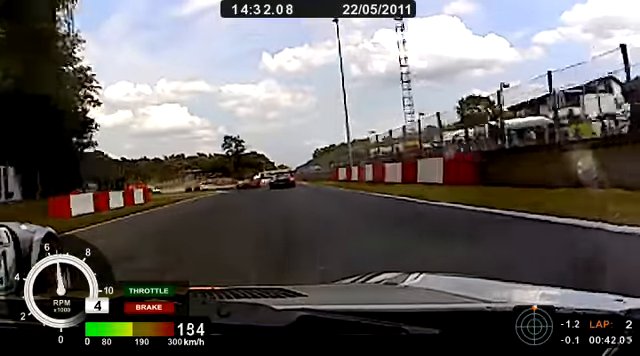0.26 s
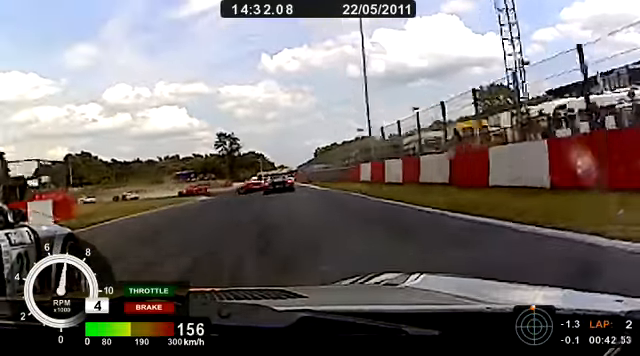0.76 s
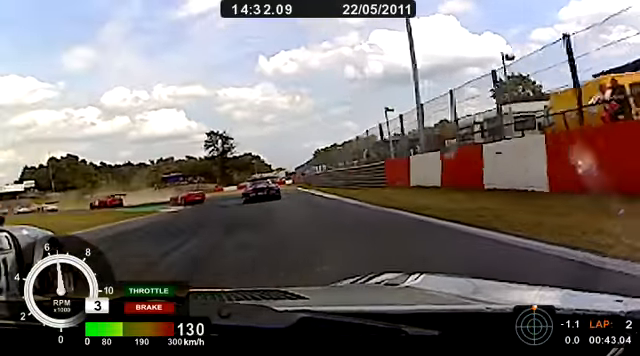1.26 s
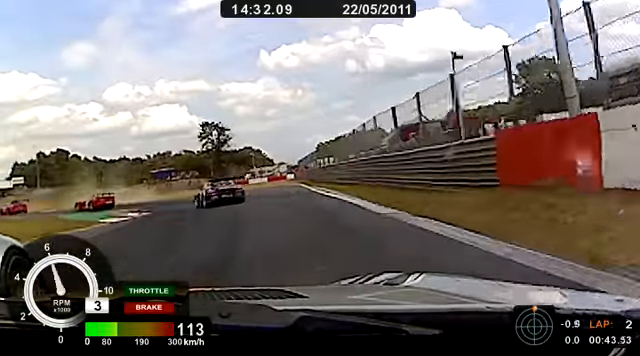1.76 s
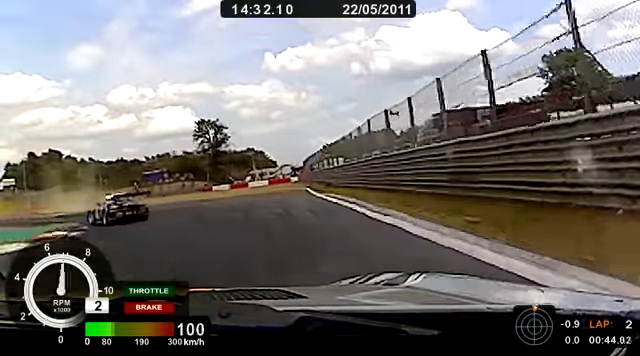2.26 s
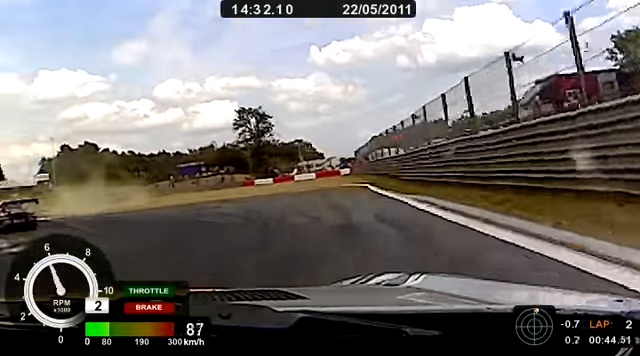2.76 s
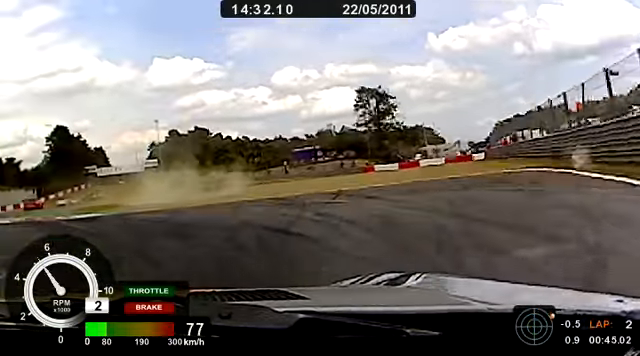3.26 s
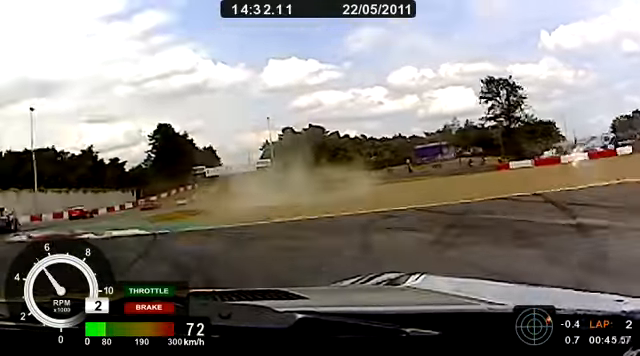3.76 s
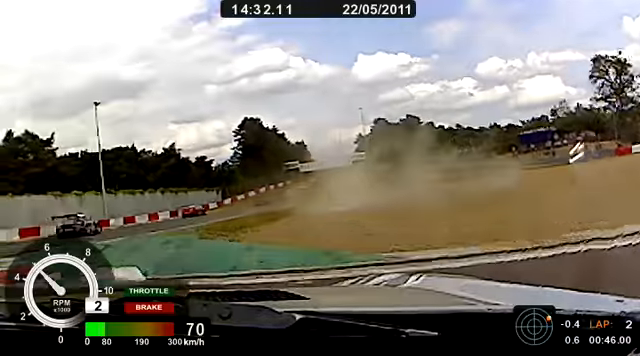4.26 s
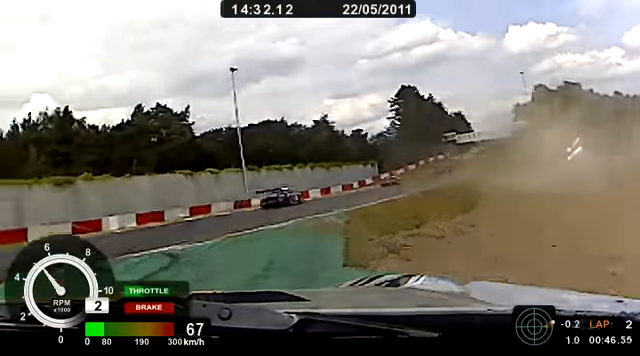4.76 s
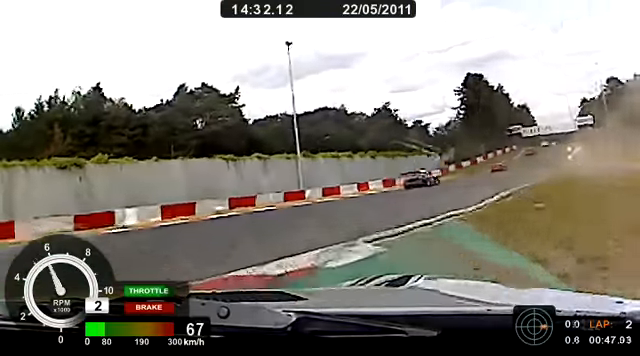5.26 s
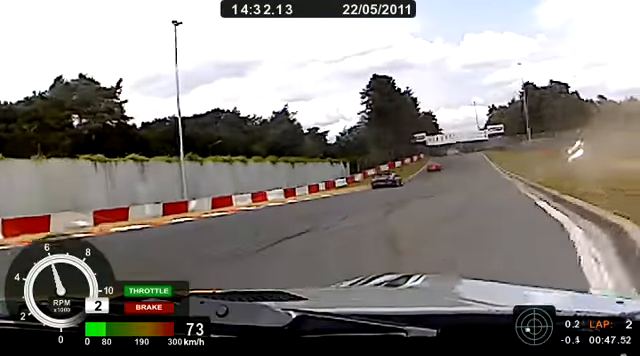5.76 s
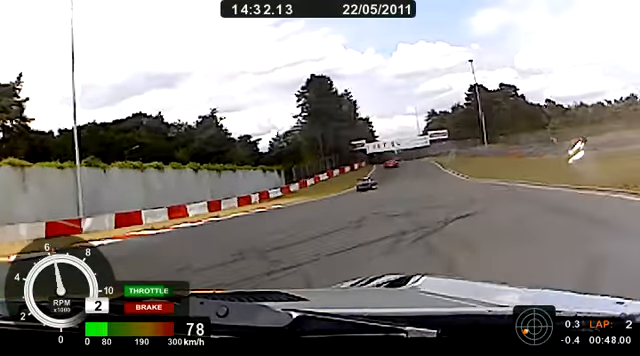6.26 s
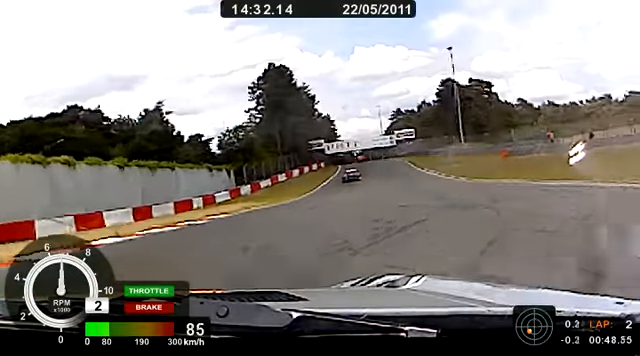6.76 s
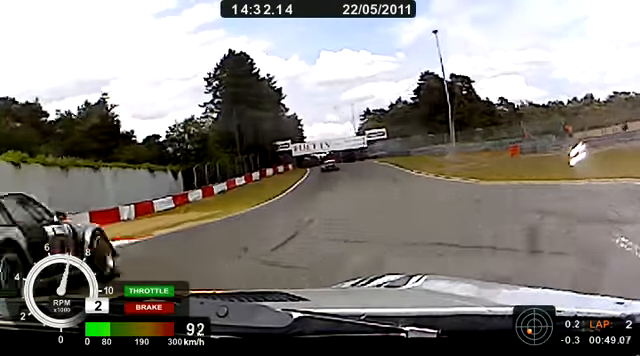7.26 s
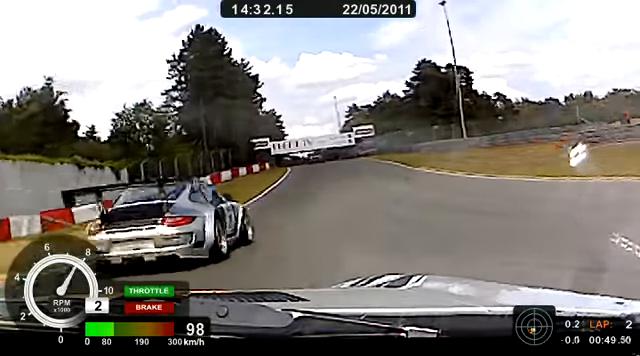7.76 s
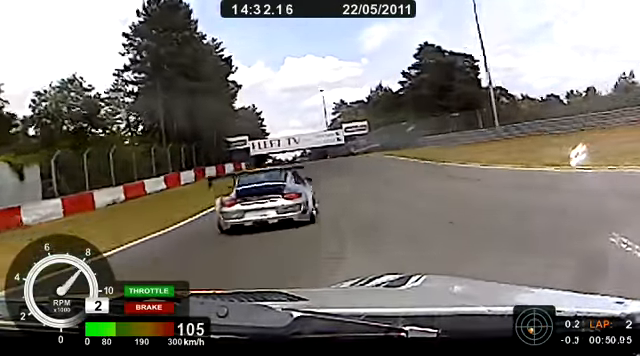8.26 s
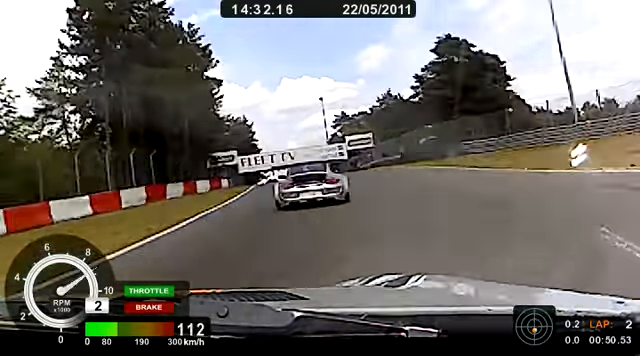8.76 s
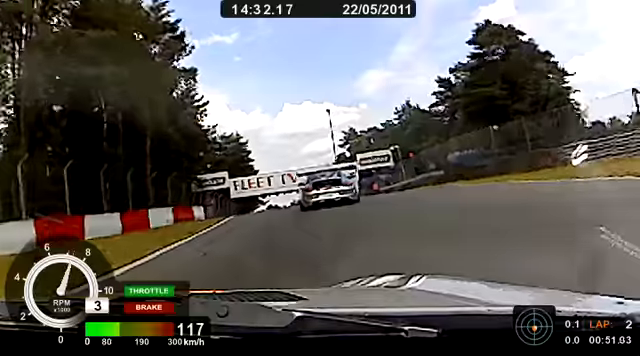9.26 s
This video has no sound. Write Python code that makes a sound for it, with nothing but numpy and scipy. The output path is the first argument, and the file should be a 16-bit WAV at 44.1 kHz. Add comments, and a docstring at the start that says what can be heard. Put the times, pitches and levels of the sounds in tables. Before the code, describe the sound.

Close inside a race car cabin, a deep V8 drone falls under braking while three downshifts make it jump up, with thumps, faint brake squeals and fading gear whine. It burbles slowly through a corner, then scrubs over a dusty kerb with knocks and stones pinging the floor. The throttle opens, another car's steady rising note passes, and the engine howls up to a thudding upshift. The small on-board microphone sounds dull on top and squashes the peaks.

```python
"""First a booming firing note inside a V8 race car as it brakes through three downshifts, gears whining.
It then runs over a kerb with scrub, knocks and grit, pulls hard and shifts up while another car passes.
A sine carries the firing note, sums of sines the crank orders; gears and the rival are gliding tones.
Filtered noise makes burble, rasp, tyres, knocks and stones; a small on-board recorder rounds off the peaks."""
import sys
import numpy as np
from scipy import signal
from scipy.fft import rfft, irfft
from scipy.io import wavfile
from scipy.ndimage import uniform_filter1d

SR = 44100
rng = np.random.default_rng(int(sys.argv[2]) if len(sys.argv) > 2 else 0)


def file_out(sig):
    """Save sig as 16-bit WAV at sys.argv[1]."""
    # one column per channel
    cols = np.atleast_2d(sig).T
    # limit, then scale
    lim = np.clip(cols, -1, 1)
    pcm = np.round(lim * 32767).astype(np.int16)
    wavfile.write(sys.argv[1], SR, pcm)


N = 419832
T = np.arange(N) / SR  # time [s]
HZ = np.maximum(np.arange(N // 2 + 1) * SR / N, 1)  # spectrum frequencies [Hz]

# throttle pedal: (time [s], opening [0-1])
THROTTLE = [(0, 0.1), (.6, 0), (4.55, 0.04), (4.7, .45), (5.85, .6), (6.1, 0.9), (8.88, 1), (8.94, 0.3),
            (9.02, 0.1), (9.1, 1), (9.52, .96)]
# driven wheels, which spin up a little over the kerb: (time [s], speed [km/h])
WHEEL_SPEED = [(0.0, 167.494), (0.19, 154.559), (0.492, 150.999), (1.037, 119.461), (1.452, 112.498),
               (1.872, 93.168), (2.181, 91.295), (2.983, 74.838), (4.439, 68.255), (5.385, 76.716),
               (5.939, 89.266), (5.993, 83.48), (7.543, 104.095), (8.025, 111.31), (8.879, 121.919),
               (9.52, 127.472)]
FIRST_RATIO = 1.3  # gear at the start [firing Hz per km/h]
# three downshifts and one upshift: (start [s], length [s], new ratio [firing Hz per km/h])
SHIFTS = [(0.154, 0.287, 1.58), (0.984, 0.315, 1.962), (1.92, 0.225, 2.435), (8.86, 0.2, 1.966)]
# jolts that set the driveline winding and unwinding:
# (time [s], swing of the firing rate [Hz], swing rate [Hz], decay [s])
DRIVELINE_JOLTS = [(0.838, 20.853, 3.403, 0.111), (3.283, 14.301, 3.613, 0.31),
                   (4.337, 12.283, 3.529, 0.581), (4.873, 6.491, 4.882, 0.702),
                   (5.071, 13.882, 3.344, 0.39), (5.744, 25.07, 6.562, 0.118),
                   (8.999, -19.723, 5.644, 0.219)]

# cabin response to the firing note, before a common trim: (firing rate [Hz], level [dB])
CABIN_BOOM = [(160, -16.5), (168, -16), (180, -13.5), (192, -14.5), (208, -14.5), (228, -16.5), (240, -15),
              (255, -15), (264, -22.5), (272, -25.5), (280, -24), (298, -23.5)]
# brief dips of the firing note: (centre [s], half length [s], depth [dB])
NOTE_DIPS = [(0.1, 0.1, 6), (0.363, 0.031, 8.53), (0.949, 0.16, 9), (1.221, 0.031, 21), (1.947, 0.065, 11),
             (2.128, 0.014, 8.5), (2.681, 0.11, 6.5), (3.203, 0.074, 6.443), (3.945, 0.035, 6.513),
             (4.268, 0.043, 4), (4.547, 0.045, 15.949), (5.82, 0.02, 9.5), (6.3, 0.081, 5.5),
             (6.89, 0.16, 5.724), (8.986, 0.057, 7), (9.194, 0.052, 4.038)]
# throb of the unequal cylinder banks, before air modes and revs: (crank order, level [dB])
BANK_THROB = [(1, -37), (2, -38), (3, -37.5), (5, -43), (6, -45), (7, -50.5)]
# the throb grows with the revs and weakens off the throttle
THROB_FULL_HZ, THROB_DB_PER_DOUBLING, THROB_COAST_DB = 277, 9.5, 1
# air modes of the cabin: (centre [Hz], width [Hz], lift [dB])
AIR_MODES = [(145.9, 27, 8.5), (216, 30, 1.5), (345, 44, -2)]
# pipe lengths bring single orders into tune: (crank order, centre [Hz], width [Hz], lift [dB])
PIPE_TUNINGS = [(8, 360, 85, 12.5), (8, 505, 33, 14), (8, 587, 40, 9.5), (9, 630, 130, 10.5),
                (11, 590, 70, 5.5), (12, 630, 56, 5), (14, 560, 90, 5.5), (12, 780, 10, 11.5),
                (12, 860, 35, 2.5), (14, 880, 69, 13), (15, 800, 70, 6), (16, 1400, 60, 4.5),
                (20, 1330, 130, 5), (21, 1170, 160, 6.5), (26, 1890, 79, 9.5), (28, 1880, 130, 3.5),
                (32, 2360, 60, 8)]
# exhaust and intake as they reach the cabin: (frequency [Hz], level [dB])
EXHAUST_COLOUR = [(250, -8.5), (460, -10.5), (700, -7.5), (1000, -10), (1500, -20), (2400, -33),
                  (4000, -35), (7000, -47.5)]
# panel and air resonances between engine and seat: (centre [Hz], width [Hz], lift [dB])
PANEL_MODES = [(598, 80, 6.5), (850, 70, 0.5), (1060, 590, 0), (1880, 230, 7.5), (2900, 430, 5.5)]
# spectrum of the exhaust burble: (frequency [Hz], density [dB per Hz])
BURBLE_COLOUR = [(90, -30.5), (150, 1.5), (190, 3.5), (240, 0.5), (280, -15.5), (340, -7), (430, -27.5),
                 (800, -44)]
# spectrum of the mechanical rasp: (frequency [Hz], density [dB per Hz])
RASP_COLOUR = [(700, -7.5), (1400, 2), (1950, 5), (2400, -5.5), (2750, -2.5), (3120, 6), (3600, -2.5),
               (4400, -4.5), (5400, -8), (6500, -10), (7300, -19), (8200, -33.5)]
# the rasp flares soon after each downshift begins
FLARE_DB, FLARE_LAG_S, FLARE_HALF_S = 2.5, 0.17, 0.15

# spectrum of the shell shake: (frequency [Hz], density [dB per Hz])
SHAKE_COLOUR = [(12, -15), (25, -4), (45, -3.5), (68, 1.5), (90, -11), (160, -31.5)]
# spectrum of the tyre rumble: (frequency [Hz], density [dB per Hz])
RUMBLE_COLOUR = [(40, -23), (70, -6.5), (90, 4), (115, -7), (140, -8.5), (250, -7.5), (450, -37),
                 (900, -55)]
# spectrum of the panel roar: (frequency [Hz], density [dB per Hz])
ROAR_COLOUR = [(200, -7.5), (350, 1.5), (460, -6), (540, -0.5), (620, 6.5), (720, -4), (880, -4.5),
               (1150, -10.5), (1500, -17.5), (1900, -17.5), (2300, -23.5), (4000, -30)]
# swells of the low shake and rumble, from kerb, track and the upshift jolt:
# (centre [s], half length [s], extra shake [dB], extra rumble [dB])
LOW_SWELLS = [(.85, 0.28, 3, 2.5), (1.9, .25, 3, 4), (2.948, .3, 1.5, 4.5), (3.85, 0.25, 4, 7),
              (5.225, 0.074, 7.5, 4), (5.554, 0.49, 6, 3), (5.778, 0.15, 11, 4), (8.2, .5, 0, 4),
              (9.1, 0.33, 3.5, 9)]

# loudness laws below: level at the reference pace with the throttle closed
REFERENCE_KM_H, REFERENCE_HZ = 100, 200
# exhaust burble against revs: (level [dB], growth [dB per doubling], full-throttle change [dB])
BURBLE_LAW = (-26.5, 5.6, -14.5)
# crank orders against revs: (level [dB], growth [dB per doubling], full-throttle change [dB])
HOWL_LAW = (-45, 7, 11.24)
# rasp against revs: (level [dB], growth [dB per doubling], full-throttle change [dB])
RASP_LAW = (-54.5, 7.3, 3.3)
# shell shake against road speed: (level [dB], growth [dB per doubling], full-throttle change [dB])
SHAKE_LAW = (-30, 3.7, -4)
# rumble against road speed: (level [dB], growth [dB per doubling], full-throttle change [dB])
RUMBLE_LAW = (-28, 6.5, -10.5)
# panel roar against revs: (level [dB], growth [dB per doubling], full-throttle change [dB])
ROAR_LAW = (-38, 6.5, -1.6)

# tyres scrubbing over the dusty kerb: (frequency [Hz], density [dB per Hz])
SCRUB_COLOUR = [(200, -7.5), (390, 9.5), (620, -2), (900, -2.5), (1250, -3.5), (2200, -21), (4000, -27.5),
                (7000, -33.5)]
SCRUB_AT_S, SCRUB_HALF_S, SCRUB_DB = 5.26, .6, -37
# gear engagements and bumps that thump the shell: (time [s], level [dB], decay [s])
KNOCKS = [(.473, -25, 0.044), (0.816, -36, 0.016), (0.831, -23.5, 0.046), (1.659, -20.5, 0.048),
          (1.795, -31, 0.025), (2.278, -28, 0.013), (3.39, -28, 0.011), (4.669, -23.5, 0.031),
          (4.745, -27, 0.016), (4.949, -29, 0.073), (5.346, -26.5, 0.019), (5.472, -26, 0.028),
          (5.85, -26, 0.019), (5.909, -25, 0.034), (8.915, -22.5, .02), (8.952, -19.5, .04),
          (8.972, -20, .01)]
# spectrum of the knocks: (frequency [Hz], density [dB per Hz])
CLUNK_COLOUR = [(40, -5), (100, 1.5), (230, 8), (420, 2), (650, 3), (1200, -12), (2400, -23.5), (3100, -23),
                (4500, -28.5), (8000, -45)]
# larger stones on the floor, before a common lift: (time [s], level [dB], ring [Hz], decay [s])
STONES = [(2.907, -54, 7502, .002), (4.671, -61, 4000, 0.047), (5.015, -41, 6000, .002),
          (5.173, -40.5, 3300, .012), (5.345, -39.5, 3120, 0.0088), (5.446, -47, 5400, .026),
          (5.454, -40, 3180, .016), (5.518, -40.5, 3200, .015), (5.547, -46, 5450, 0.018),
          (5.644, -38.5, 4000, 0.026), (5.675, -39, 3260, 0.018), (5.739, -45.5, 6000, .04),
          (5.804, -43, 3200, .015), (5.85, -38, 3180, 0.011), (5.941, -49, 6000, .03),
          (6.066, -41, 3200, 0.0078), (6.173, -49, 5005, 0.046), (6.289, -49, 6840, .015),
          (6.318, -45, 4960, 0.02), (6.43, -51, 6550, .027), (6.945, -47, 6800, .014)]
# thin squeals, most likely from the brakes:
# (start [s], length [s], start pitch [Hz], end pitch [Hz], peak level [dB])
SQUEALS = [(.16, 0.24, 5950, 5700, -60), (0.166, .22, 2580, 2600, -52), (0.968, 0.24, 2940, 2650, -52.5),
           (.98, 0.22, 5897, 5350, -61), (1.896, 0.2, 5600, 5520, -57), (1.9, .22, 2760, 2730, -55)]
# final drive: (time [s], tooth rate [Hz], level [dB])
FINAL_DRIVE = [(0, 957, -47), (.45, 850, -49), (.9, 760, -50), (1.5, 640, -56), (2.3, 535, -62.5),
               (3.2, 407, -74)]
# passing car: (time [s], firing rate [Hz], level [dB])
RIVAL = [(5.9, 201.8, -55.5), (6.25, 217.9, -28), (6.6, 236, -34), (6.85, 250, -26), (7.05, 255.5, -28.5),
         (7.5, 276.4, -38.5), (8, 298, -55), (8.6, 310, -72.5)]
TOP_HZ = 8000  # upper limit of the recorder


def firing_rate(speed):
    """Wheel speed times the gear ratio, which slides over at each shift; jolts swing the driveline."""
    ratio = FIRST_RATIO
    for start, length, new_ratio in SHIFTS:
        engaged = np.sin(np.pi / 2 * np.clip((T - start) / length, 0, 1)) ** 2
        ratio = ratio + (new_ratio - ratio) * engaged
    hz = speed * ratio
    for start, swing_hz, rate, decay in DRIVELINE_JOLTS:
        age = np.maximum(T - start, 0)
        hz = hz + swing_hz * np.sin(2 * np.pi * rate * age) * np.exp(-age / decay)
    return hz


def engine(hz, note_db, howl_db, rasp_db, throttle, hunt=.004, whine_db=-54):
    """Firing note, bank throb, burble, crank orders and rasp, all driven by the firing rate."""
    coast = 1 - throttle
    # combustion is uneven off the throttle and steadies under load
    uneven_hz = hz * (1 + .001 * walk(60) + hunt * coast * walk(25))
    turns = np.cumsum(uneven_hz) / SR / 4  # four firings per crank turn
    firing = 8 * np.pi * turns
    note = np.sqrt(2) * np.sin(firing) * undb(note_db + (.5 + .8 * coast) * walk(45))
    burble = colour(noise(), BURBLE_COLOUR) * undb(law(BURBLE_LAW, hz / REFERENCE_HZ, throttle))
    roughness = 1 + (.12 + 0.32 * coast) * walk(400)
    orders = colour(crank_orders(turns, hz) * roughness, EXHAUST_COLOUR, PANEL_MODES)
    # rasp pulses with the firings and the crank turn
    pulse = 1 + .2 * np.cos(firing) + .11 * np.cos(2 * np.pi * turns)
    rasp = colour(noise() * pulse, RASP_COLOUR) * undb(rasp_db + 1.2 * walk(25))
    # a thin whine just under eight times the firing rate sings out when it meets a panel resonance
    whine = np.sin(7.93 * firing) * np.exp(-((7.93 * hz - 1700) / 170) ** 2)
    whine = whine * coast * undb(whine_db + 2 * walk(12))
    return note + bank_throb(turns, hz, coast) + burble + orders * undb(howl_db) + rasp + whine


def note_level(hz, trim_db=1.33, flutter_db=1.5):
    """The firing note follows the cabin's response, sags unevenly and now and then dips."""
    dips = sum(depth_db * swell(s, half) for s, half, depth_db in NOTE_DIPS)
    return np.interp(hz, *np.transpose(CABIN_BOOM)) + trim_db - dips - flutter_db * np.abs(walk(16))


def bank_throb(turns, hz, coast):
    """Low crank orders swell as they cross the air modes, and stumble more off the throttle."""
    out = np.zeros(N)
    effort_db = THROB_DB_PER_DOUBLING * np.log2(hz / THROB_FULL_HZ) - THROB_COAST_DB * coast
    for order, db in BANK_THROB:
        order_hz = order * hz / 4
        lift = sum(hump(order_hz, *mode) for mode in AIR_MODES)
        stumble = (3.0 + 3 * coast) * walk(22)
        sine = np.sin(2 * np.pi * (order * turns + rng.random()))
        out += np.sqrt(2) * sine * undb(db + lift + effort_db + stumble)
    return out


def crank_orders(turns, hz, firing_db=6, ripple_db=4, count=72):
    """Harmonics of the crank turn; firing multiples stand out over those from unequal cylinders."""
    out = np.zeros(N)
    spin = np.exp(2j * np.pi * turns)
    order = spin ** 6
    grid = np.arange(0, 6000, 12)  # Hz
    # each order's level varies at random with pitch, more deeply towards the treble
    ripple_depth = np.clip(grid / 1500, 0, 1)
    for k in range(7, count + 1):
        order = order * spin
        start = rng.uniform(0, 2 * np.pi)
        ripple = unit(uniform_filter1d(rng.standard_normal(len(grid)), size=4))
        db = firing_db if k % 4 == 0 else 0
        db = db + ripple_db * ripple_depth * np.clip(ripple, -2, 1.2)
        for tuned, centre, width, lift in PIPE_TUNINGS:
            if tuned == k:
                db = db + hump(grid, centre, width, lift, steepness=4)
        # each order swells and fades as it glides through these peaks
        out += np.interp(k * hz / 4, grid, undb(db)) * (order * np.exp(1j * start)).real
    return out


def road(shake_db, rumble_db, roar_db):
    """Noise bands for the tyres shaking the shell, their rumble, and the roaring panels."""
    shake = colour(noise(), SHAKE_COLOUR) * undb(shake_db + 1.1 * walk(14))
    rumble = colour(noise(), RUMBLE_COLOUR) * undb(rumble_db + 1.7 * walk(13))
    roar = colour(noise(), ROAR_COLOUR) * undb(roar_db + 1.8 * walk(30))
    return shake + rumble + roar


def kerb_scrub():
    """A gritty rush that swells and fades as the tyres scrub over the kerb."""
    rush = colour(noise() * undb(2.5 * walk(200)), SCRUB_COLOUR)
    return rush * undb(SCRUB_DB + 1.7 * walk(18)) * swell(SCRUB_AT_S, SCRUB_HALF_S)


def knocks():
    """Each blow sets the driveline and the shell chattering."""
    chatter = colour(noise() * undb(2.7 * walk(300)), CLUNK_COLOUR)
    return chatter * sum(undb(db) * burst(s, decay, rise=0.0011) for s, db, decay in KNOCKS)


def grit(clicks_per_s=2200, lift_db=5.5):
    """Small stones hit the floor and wheel arches: a first tick, then a dying spray."""
    out = np.zeros(N)
    clicks = noise() * (rng.random(N) < clicks_per_s / SR)
    spray = unit(clicks) + .5 * noise()
    for s, db, hz, decay in STONES:
        tick = .5 * noise() * burst(s, 0.0014, rise=.0001)
        hits = spray * burst(s, decay, rise=0.00048) + tick
        out += undb(db + lift_db) * ring(hits, hz, 3)
    # the floor pan adds its own ring to every stone
    return out + 0.8 * ring(out, 3100, 7)


def squeals():
    """Short, patchy, wavering sines that glide in pitch."""
    out = np.zeros(N)
    waver = 1 + .02 * walk(500) + .01 * walk(25)
    for start, length, from_hz, to_hz, db in SQUEALS:
        part = np.clip((T - start) / length, 0, 1)
        glide_hz = from_hz + (to_hz - from_hz) * part
        phase = 2 * np.pi * np.cumsum(glide_hz * waver) / SR
        out += undb(db) * np.sin(np.pi * part) * np.sin(phase)
    return out * undb(2.5 * walk(40))


def gear_whine():
    """Meshing teeth of the final drive sing at the tooth rate and its octave, flickering."""
    return tone(FINAL_DRIVE, waver=0.01, flicker_db=5.0, overtone_db=-16.0)


def rival():
    """The passing car's firing note, a steadier tone that rises in pitch."""
    return tone(RIVAL, waver=0.0013, flicker_db=0.5, overtone_db=-29.5)


def tone(table, waver, flicker_db, overtone_db):
    """A wavering line with its octave."""
    hz, db = curves(table)
    phase = 2 * np.pi * np.cumsum(hz * (1 + waver * walk(30))) / SR
    wave = np.sin(phase) + undb(overtone_db) * np.sin(2 * phase)
    return np.sqrt(2) * wave * undb(db + flicker_db * walk(11))


def law(constants, pace, throttle):
    """A level in dB that grows with pace and changes with the throttle."""
    base_db, doubling_db, load_db = constants
    return base_db + doubling_db * np.log2(pace) + load_db * throttle


def swell(centre, half_length):
    """A smooth rise and fall, 1 at its centre."""
    return np.exp(-((T - centre) / half_length) ** 2)


def burst(start, decay, rise):
    """A quick rise and an exponential fall."""
    age = np.maximum(T - start, 0)
    return (1 - np.exp(-age / rise)) * np.exp(-np.minimum(age / decay, 50))


def ring(x, hz, sharpness):
    """A single resonance struck by x; sharpness is its Q."""
    return signal.lfilter(*signal.iirpeak(hz, sharpness, fs=SR), x)


def hump(hz, centre, width, lift, steepness=2):
    """Lift in dB around a resonance, half as high at the edges of its width."""
    return lift / (1 + (2 * (hz - centre) / width) ** steepness)


def colour(x, points, resonances=()):
    """Filter by a smooth spectrum with resonant humps on it; rms 1."""
    hz, db = np.transpose(points)
    db = np.interp(np.log(HZ), np.log(hz), db)
    # above the last point the spectrum falls 12 dB per octave
    db = db - 40 * np.log10(np.maximum(HZ / hz[-1], 1))
    for resonance in resonances:
        db = db + hump(HZ, *resonance)
    return unit(irfft(rfft(x) * undb(db), N))


def noise():
    """White noise."""
    return rng.standard_normal(N)


def walk(rate):
    """Smooth random drift with about rate new values a second; rms 1."""
    k = max(int(SR / rate), 2)
    drift = np.interp(T * rate, np.arange(8192), rng.standard_normal(8192))
    return unit(uniform_filter1d(drift, k // 2))


def curves(table):
    """Each column of a table, joined by straight lines in time."""
    s, *columns = np.transpose(table)
    return [np.interp(T, s, c) for c in columns]


def undb(db):
    """Decibels to gain."""
    return 10 ** (np.asarray(db) / 20)


def unit(x):
    """Scale to rms 1."""
    return x / np.sqrt(np.mean(x ** 2))


def scene():
    """Everything as heard between the seats."""
    speed = curves(WHEEL_SPEED)[0]
    throttle = np.clip(curves(THROTTLE)[0], 0, 1)
    hz = firing_rate(speed)
    pace, revs = speed / REFERENCE_KM_H, hz / REFERENCE_HZ
    flares = sum(swell(s + FLARE_LAG_S, FLARE_HALF_S) for s, _, _ in SHIFTS[:-1])  # downshifts only
    rasp_db = law(RASP_LAW, revs, throttle) + FLARE_DB * flares
    motor = engine(hz, note_level(hz), law(HOWL_LAW, revs, throttle), rasp_db, throttle)
    extra_shake_db = sum(db * swell(s, half) for s, half, db, _ in LOW_SWELLS)
    extra_rumble_db = sum(db * swell(s, half) for s, half, _, db in LOW_SWELLS)
    shake_db = law(SHAKE_LAW, pace, throttle) + extra_shake_db
    rumble_db = law(RUMBLE_LAW, pace, throttle) + extra_rumble_db
    tyres = road(shake_db, rumble_db, law(ROAR_LAW, revs, throttle))
    mix = motor + tyres + kerb_scrub() + knocks() + grit() + squeals() + gear_whine() + rival()
    return mix[None]


def record(dry, ceiling=0.4, knee=12):
    """The recorder flattens the highest swings and cuts the top."""
    clipped = dry / (1 + np.abs(dry / ceiling) ** knee) ** (1 / knee)
    return signal.sosfilt(signal.ellip(8, .2, 70, TOP_HZ, fs=SR, output="sos"), clipped)


dry = scene()
out = record(dry)
file_out(out)
```